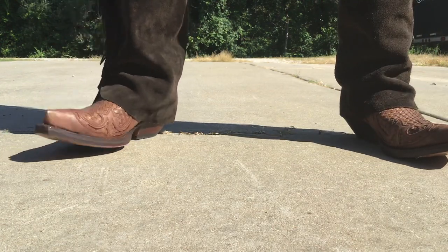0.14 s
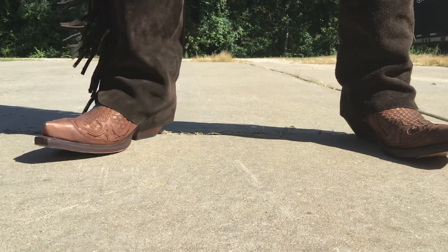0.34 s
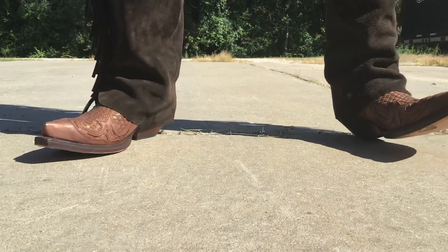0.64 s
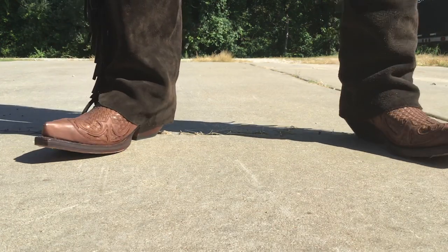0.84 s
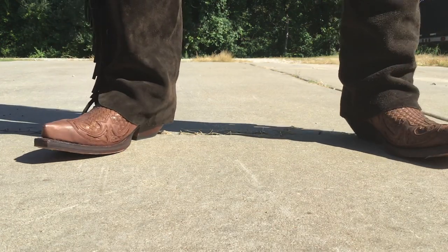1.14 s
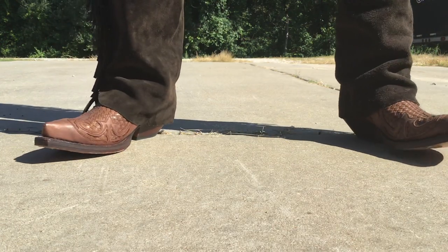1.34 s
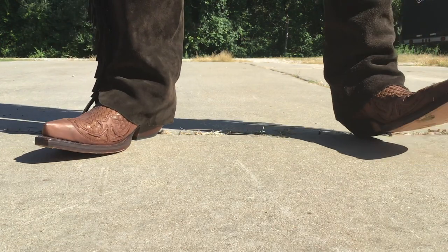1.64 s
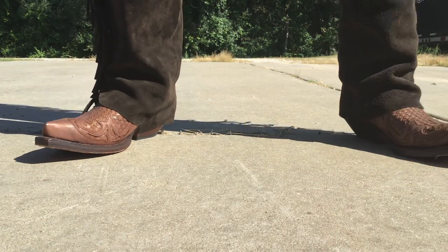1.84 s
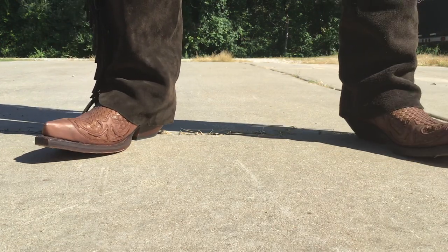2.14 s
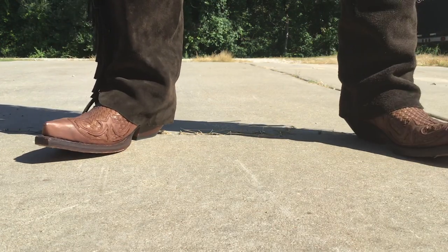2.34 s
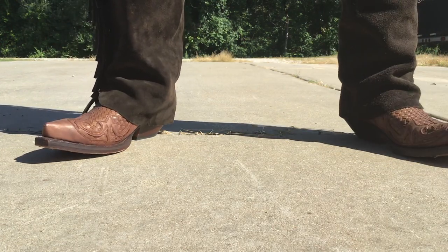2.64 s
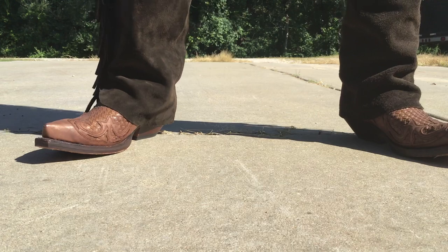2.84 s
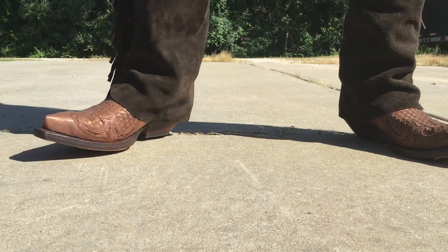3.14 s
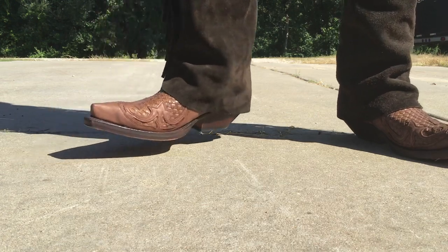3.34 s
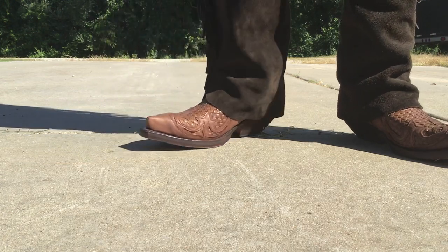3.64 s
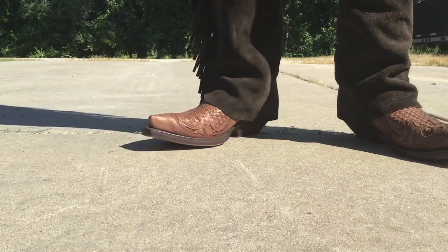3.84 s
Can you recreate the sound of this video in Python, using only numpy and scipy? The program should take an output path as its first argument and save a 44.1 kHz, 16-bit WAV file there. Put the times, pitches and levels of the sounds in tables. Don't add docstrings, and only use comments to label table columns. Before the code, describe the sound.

Leather boot soles slap concrete close to a small camera, four spaced taps then a softer, gritty step; outdoors, a steady high insect buzz, faint low machine hum and distant rumble continue throughout.

```python
import sys
import numpy as np
from scipy import signal
from scipy.fft import rfft, irfft, next_fast_len
from scipy.io import wavfile
from scipy.ndimage import uniform_filter1d, map_coordinates

SR = 44100
rng = np.random.default_rng(int(sys.argv[2]) if len(sys.argv) > 2 else 0)


def to_linear_factor(level_db):
    exponent = np.asarray(level_db, float) / 20
    return 10 ** exponent


def generate_wav(sig):
    pcm = np.round(np.clip(np.atleast_2d(sig).T, -1, 1) * 32767).astype(np.int16)
    wavfile.write(sys.argv[1], SR, pcm)


N = 175959

# (frequency [Hz], density [dB per Hz])
AIR = [(110, -34), (190, -0.5), (279, -3), (633, -6.5), (736, -6), (821, -10.5), (1360, -19.5),
       (5000, -21.5), (6500, -30.5), (11000, -120)]
RUMBLE = [(15, -71), (40, -23), (75, 1), (113, -0.5), (139, -3.5), (150, -3.5), (200, -6), (330, -120)]
HISS = [(3000, -86), (5000, -4.5), (7500, 8), (9000, -3), (11000, -22), (12500, -40)]
# (time [s], frequency [Hz], level [dB])
MACHINE = [(0, 172.9, -42.5), (.25, 171.9, -41.5), (.54, 170.5, -41.5), (.8, 169.9, -48),
           (1.25, 169.1, -48), (1.47, 168.6, -47.5), (1.65, 167.9, -50), (2.0, 168.2, -59.5),
           (2.31, 167.5, -49.5), (2.94, 166.6, -45.5), (3.14, 164.6, -48.5), (3.99, 163.6, -44.5)]
# (frequency [Hz], density [dB per Hz])
TOP_HISS = [(10500, -26), (12500, -8), (14000, -2), (15750, 3), (15900, -40)]
CLOTH = [(8000, -30), (11000, 1), (15700, 2), (15900, -40)]
# (time [s], length [s], level [dB])
FOOT_SHIFTS = [
    (2.57, .14, -80),
    (2.99, .15, -70),
    (3.7, .34, -74),
    (.68, .25, -79),
    (1.49, .08, -77),
]
# (time [s], clear part [dB], blurred part [dB], turned away [0-1])
INSECT_LEVEL = [
    (0, -51, -65, 0),
    (.45, -51.5, -64.5, 0),
    (.75, -53.5, -63, 0),
    (1.05, -52, -64.5, .3),
    (1.5, -51, -66, .7),
    (2, -51.5, -68, 1),
    (3, -52, -68, 1),
    (3.5, -53.5, -67, 1),
    (3.75, -57.5, -65, .5),
    (3.99, -57.5, -64, .3),
]
# (time [s], pulse rate [Hz])
WING_RATE = [
    (0, 212.68),
    (1, 212.77),
    (2, 212.76),
    (2.8, 212.66),
    (3.05, 212.8),
    (3.62, 212.77),
    (3.75, 212.05),
    (3.99, 211.8),
]
# (multiple of pulse rate, facing level [dB], turned level [dB])
WING_HARMONICS = [(25, -35, -37), (26, -33, -30), (27, -22, -19), (28, -20, -29), (29, -28, -18),
                  (30, -25, -26), (31, -24, -21), (32, -21, -24), (33, -18, -19), (34, -23, -15),
                  (35, -14, -8), (36, -10, -15), (37, -4, -4), (38, -11, -14), (39, -18, -22),
                  (40, -19, -18), (41, -12, -10), (42, -19, -36), (43, -9, -7), (44, -15, -26),
                  (45, -13, -19), (46, -18, -32), (47, -13, -17), (48, -28, -31), (49, -17, -14),
                  (50, -29, -33), (51, -24, -28), (52, -35, -34), (53, -35, -24), (54, -37, -46),
                  (55, -29, -41), (56, -39, -51), (57, -30, -27), (58, -35, -46), (59, -30, -33),
                  (60, -39, -40), (61, -36, -37), (62, -57, -64), (63, -58, -60)]
# (frequency [Hz], density [dB per Hz])
FAR_BUZZ = [(4500, -40), (5600, -6), (7000, -4.5), (8000, 2), (9500, 1), (10300, -8), (12500, -14),
            (14000, -60)]
# (time [s], peak [dB], low part over high part [dB])
TAP_GRIT = [(0.0954, -53, 0.5), (0.1925, -33, 7), (0.2014, -43, -13), (0.2068, -32, -24),
            (0.6936, -40.5, -9), (0.8036, -43, -19), (0.879, -46, 4.5), (1.0945, -55, 3),
            (1.1012, -40.5, 3), (1.1034, -42, -12), (1.1548, -40, -10), (1.5125, -39.5, -17),
            (1.5479, -37, -22), (1.699, -26.5, -15), (1.7838, -39, -16), (1.8376, -23, -8.5),
            (1.8911, -40, -8.5), (2.1094, -57, -6), (2.594, -37, -25), (2.6784, -49, -20),
            (2.9542, -40, -21), (2.9672, -29, -36), (2.9875, -32.5, -27), (3.0493, -41, -13),
            (3.0744, -46.5, -7.5), (3.088, -45, -13), (3.8365, -48, -18), (3.948, -46, -9),
            (3.9755, -43, -18)]
STEP_GRIT = [(3.6375, -24, -10), (3.6382, -22.5, -7), (3.6392, -26, -7.5), (3.6399, -29, -3.5),
             (3.6405, -42, -18), (3.6419, -19, -20), (3.6428, -30, -7), (3.6438, -30, -19.0),
             (3.6568, -27, -14), (3.664, -26, -16), (3.6646, -23.5, -36), (3.6655, -26, -19),
             (3.6676, -32.0, -26.0), (3.6683, -30.0, -28), (3.6691, -21, -38), (3.6705, -27.0, -32.0),
             (3.6714, -24, -27), (3.6723, -35, -14), (3.6809, -36, -23.0), (3.681, -38.0, -18.0),
             (3.6864, -30, -15.0), (3.6948, -12, -29), (3.6957, -26, -10), (3.6969, -18.5, -25),
             (3.6977, -19, -25), (3.6989, -28, -19), (3.7084, -19.5, -27), (3.7091, -34, -10),
             (3.7097, -44, -20.0), (3.7653, -41.0, -11.0), (3.7987, -25, -10.5), (3.9134, -50.0, -16.0),
             (3.927, -41, -18), (3.9574, -45, -4.0), (3.9659, -31.5, -11)]
# (frequency [Hz], width [Hz], level [dB])
TAP_GRAIN = [(5700, 2700, -4), (9870, 1700, 8), (14100, 1000, 7.5)]
TAP_GRAIN_LOW = [(2490, 1390, -1.5), (3770, 690, 0), (4780, 800, -4)]
STEP_GRAIN = [(5900, 1900, -11.5), (9840, 1400, 1), (13800, 3500, -7.5)]
STEP_GRAIN_LOW = [(2050, 1700, -1.5), (3760, 1160, 1), (5750, 1050, -4)]
# (frequency [Hz], density [dB per Hz])
SAND = [(1500, -14), (5000, -4), (9000, 0), (16000, -2)]
SETTLING = [(60, -22), (110, -15), (300, 4), (800, -6), (1500, -21.5), (3500, -26), (6000, -45)]
# (time [s], peak [dB], cushion [Hz], sole [Hz], cushion lag [s])
SLAPS = [
    (0.1934, -13, 310, 660, 0.0032),
    (0.7346, -22, 260, 703, 0.0034),
    (1.0952, -21, 315, 625, 0.0019),
    (1.8358, -19, 323, 633, 0.0022),
    (3.6389, -33, 278, 574, 0.0037),
]
# (edge [Hz], edge [dB], welt [Hz], welt [dB], sole [dB])
SLAP_PARTS = [
    (2590, -6.5, 1200, -11.5, -6.5),
    (1980, 1.5, 1300, -7.5, 0.5),
    (2020, -11.5, 1030, -11, 0),
    (1910, -3, 1140, -9, 1.5),
    (2860, -4, 1330, -2.5, -7.5),
]
# (edge length [s], edge sag [ratio], cushion length [s], cushion sag [ratio], settling [dB])
ROLLS = [
    (0.00183, 0.32, 0.0062, 0.051, -6.5),
    (0.0017, 0.29, .008, 0.47, 1.5),
    (0.0019, 0.22, 0.00764, 0.49, 1),
    (0.0017, 0.23, .008, 0.45, -1),
    (.0018, 0.22, 0.0092, 0.39, 6),
]


def unit(x):
    return x / np.sqrt(np.mean(x ** 2) + 1e-20)


def along(points, hz):
    f, v = np.transpose(points)
    return np.interp(np.log(hz + 1), np.log(f + 1), v, left=-120, right=-120)


def curves(rows):
    s, *cols = np.transpose(rows)
    return [np.interp(np.arange(N) / SR, s, c) for c in cols]


def wobble(rate):
    knots = rng.standard_normal(int(N * rate / SR) + 4)
    return map_coordinates(knots, [np.arange(N) * rate / SR])


def filtered(x, response):
    m = next_fast_len(N + SR // 2)
    return irfft(rfft(x, m) * response(np.fft.rfftfreq(m, 1 / SR)), m)[:N]


def noise(spectrum):
    return unit(filtered(rng.standard_normal(N), lambda hz: to_linear_factor(along(spectrum, hz))))


def swell(t, length, skew=1.0):
    return np.sin(np.pi * np.clip(t / length, 0, 1) ** skew)


def burst(t, hz, length, sag):
    u = np.clip(t / length, 0, 1)
    cycles = hz * length * ((1 + sag) * u - sag * u * u)
    return swell(t, length, 0.88) * np.sin(2 * np.pi * cycles)


def resonant(x, peaks, order):
    def response(f):
        total = 0
        for k, (center, width, db) in enumerate(peaks):
            band = 1j * f * width / (center * center - f * f + 1j * f * width)
            total = total + (-1) ** k * to_linear_factor(db) * band
        return total ** order

    click = filtered(np.arange(N) == 0, response)
    return filtered(x, response) / np.abs(click).max()


def yard():
    air = to_linear_factor(-56 + 0.81 * wobble(2.8) + 0.82 * wobble(12)) * noise(AIR)
    rumble = to_linear_factor(-55 + 3.3 * wobble(3.137)) * noise([*RUMBLE, (190, -12)])
    hiss = to_linear_factor(-67.5 + 0.3 * wobble(6.6)) * noise(HISS)
    return air + rumble + hiss


def hum():
    hz, db = curves(MACHINE)
    turn = 2 * np.pi * np.cumsum(hz + 0.52 * wobble(6.07)) / SR
    return np.sqrt(2) * to_linear_factor(db + 0.87 * wobble(6.19)) * np.sin(turn)


def top_hiss():
    z = signal.stft(noise(TOP_HISS), nperseg=256)[2]
    patches = uniform_filter1d(rng.standard_normal(z.shape), 4, 0)
    patches = uniform_filter1d(patches, 22, 1)
    patch_db, drift_db = 7, 3
    patchy_hiss = signal.istft(z * to_linear_factor(patch_db * unit(patches)), nperseg=256)[1][:N]
    return to_linear_factor(-84 + drift_db * wobble(8.9)) * unit(patchy_hiss)


def foot_shifts():
    time = np.arange(N) / SR
    shift = sum(to_linear_factor(db) * swell(time - s, length) for s, length, db in FOOT_SHIFTS)
    return shift * noise(CLOTH) * to_linear_factor(4.4 * wobble(150))


def insect():
    (rate,) = curves(WING_RATE)
    clear_db, blur_db, turned = curves(INSECT_LEVEL)
    waver_hz, flutter_hz = 0.075, 60
    fade_slow_db, fade_fast_db, wash_db = 1.5, 0.5, 1
    turn = 2 * np.pi * np.cumsum(rate + waver_hz * wobble(11)) / SR
    lines, halo = np.zeros(N), np.zeros(N)
    for k, facing_db, turned_db in WING_HARMONICS:
        db = facing_db + np.clip(turned, 0, 1) * (turned_db - facing_db)
        tone = np.sqrt(2) * np.sin(k * turn + 2 * np.pi * rng.random())
        fade_db = fade_slow_db * wobble(1.54) + fade_fast_db * wobble(7.13)
        lines += to_linear_factor(db + fade_db) * tone
        halo += to_linear_factor(db) * wobble(flutter_hz) * tone
    blur = unit(halo) + to_linear_factor(wash_db) * noise(FAR_BUZZ)
    return to_linear_factor(clear_db) * lines + to_linear_factor(blur_db) * blur


def grit(rows, grain, grain_low, crumb_db):
    s, db, low_db = np.transpose(rows)
    crumb_s, scatter_db = 0.0036, -13.5
    delay, scatter, sign = np.moveaxis(rng.random((len(s), 3, 14)), 1, 0)
    delay[:, 0], scatter[:, 0] = 0, 0.5
    after = delay ** 1.3
    level_db = db[:, None] + (after > 0) * crumb_db - 14 * after + scatter_db * 2 * (scatter - 0.5)
    size = to_linear_factor(level_db) * np.sign(sign - 0.5)
    low_size = size * to_linear_factor(np.minimum(low_db, 3))[:, None]
    at = np.round((s[:, None] + 0.00084 + after * crumb_s) * SR).astype(int).ravel()
    high = np.bincount(at, size.ravel(), N)[:N]
    low = np.bincount(at, low_size.ravel(), N)[:N]
    return resonant(high, grain, order=1) + to_linear_factor(3.0) * resonant(low, grain_low, order=2)


def sand():
    time = np.arange(N) / SR
    dust = sum(to_linear_factor(db) * swell(time - s, 0.012, 0.5) for s, db, *_ in SLAPS)
    scuff = swell(time - 3.64, 0.08)
    hiss = noise(SAND) * to_linear_factor(4.5 * wobble(400))
    return (to_linear_factor(-31) * dust + to_linear_factor(-57) * scuff) * hiss


def settling():
    lag_s, rise_s, t60_s = 0.0098, 0.0023, 0.1
    level = np.zeros(N)
    for (s, db, *_), (*_, settle_db) in zip(SLAPS, ROLLS):
        late = np.maximum(np.arange(N) / SR - s - lag_s, 0)
        level += to_linear_factor(db + settle_db - 60 * late / t60_s) * (1 - np.exp(-late / rise_s))
    return to_linear_factor(-16 + 5.4 * wobble(110)) * level * noise(SETTLING)


def slaps():
    out, time = np.zeros(N), np.arange(N) / SR
    for slap, parts, roll in zip(SLAPS, SLAP_PARTS, ROLLS):
        s, db, cushion_hz, sole_hz, cushion_lag = slap
        edge_hz, edge_db, welt_hz, welt_db, sole_db = parts
        edge_s, edge_sag, cushion_s, cushion_sag, _ = roll
        t = time - s
        edge = to_linear_factor(edge_db) * burst(t, edge_hz, edge_s, edge_sag)
        welt = to_linear_factor(welt_db) * burst(t - 0.00094, welt_hz, 0.0037, 0.068)
        sole = to_linear_factor(sole_db) * burst(t - 0.00071, sole_hz, 0.0047, 0.17)
        cushion = burst(t - cushion_lag, cushion_hz, cushion_s, cushion_sag)
        thud = to_linear_factor(-22) * burst(t - 0.011, 75.7, 0.032, 0.14)
        out += to_linear_factor(db) * (edge + welt + sole + cushion + thud)
    heel = to_linear_factor(-33) * burst(time - 3.641, 280, 0.032, 0.098)
    return filtered(out + heel + settling() + sand(), lambda hz: (1j * hz / (45 + 1j * hz)) ** 2)


def scene():
    background = yard() + hum() + top_hiss() + foot_shifts() + insect()
    tap_cracks = grit(TAP_GRIT, TAP_GRAIN, TAP_GRAIN_LOW, crumb_db=-13.5)
    step_cracks = grit(STEP_GRIT, STEP_GRAIN, STEP_GRAIN_LOW, crumb_db=-27)
    return (background + tap_cracks + step_cracks + slaps())[None]


def low_pass(x):
    return signal.sosfilt(signal.butter(12, 16980, fs=SR, output="sos"), x)


def record(dry):
    mix = filtered(dry[0], lambda hz: 1 / (1 + (hz / 16250) ** 80))[None]
    return low_pass(mix)


dry = scene()
out = record(dry)
generate_wav(out)
```